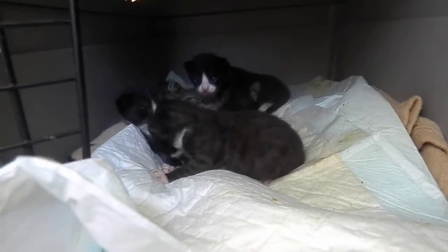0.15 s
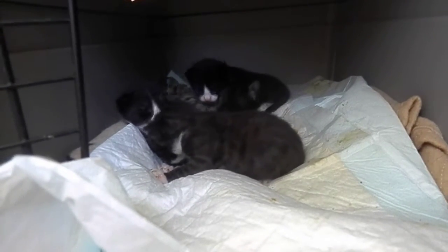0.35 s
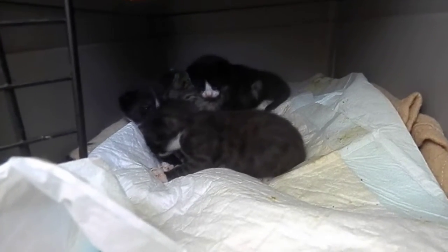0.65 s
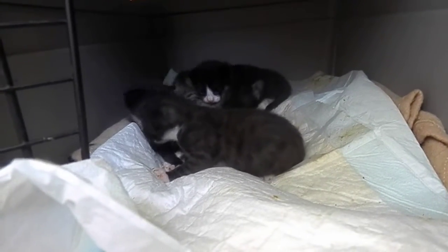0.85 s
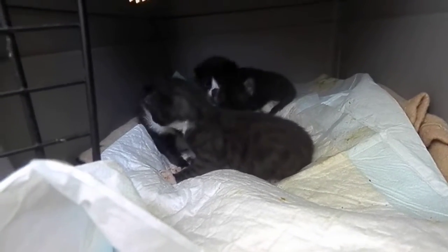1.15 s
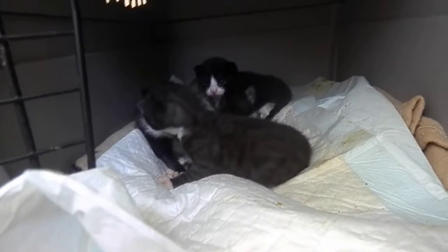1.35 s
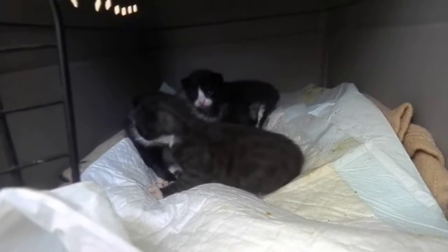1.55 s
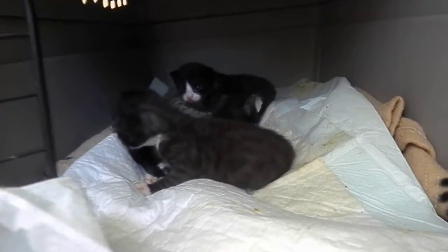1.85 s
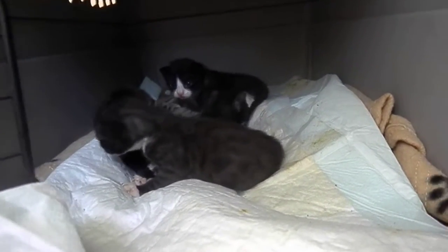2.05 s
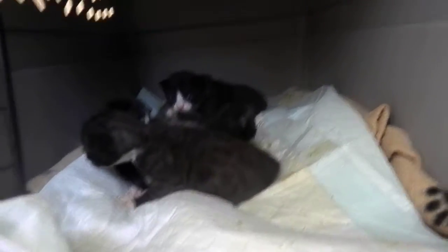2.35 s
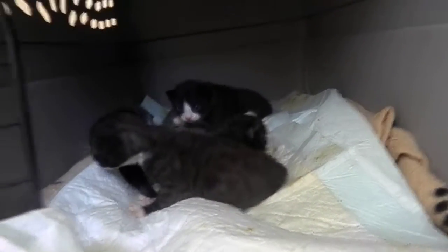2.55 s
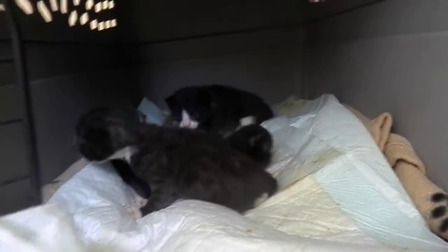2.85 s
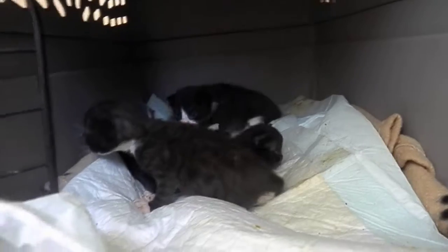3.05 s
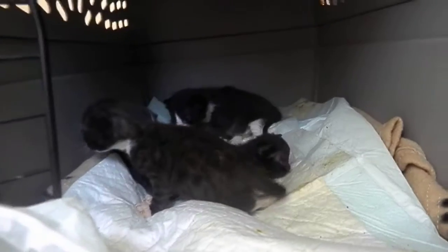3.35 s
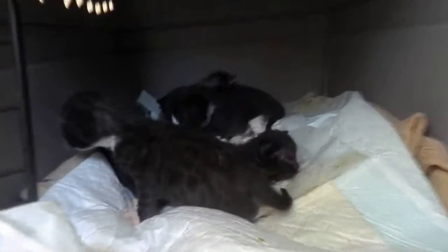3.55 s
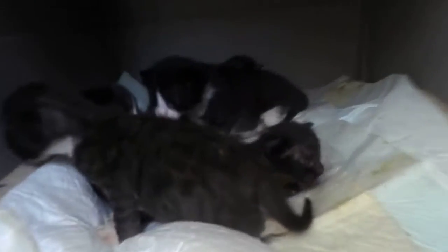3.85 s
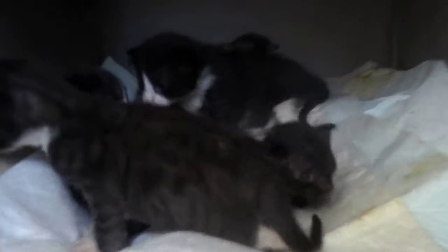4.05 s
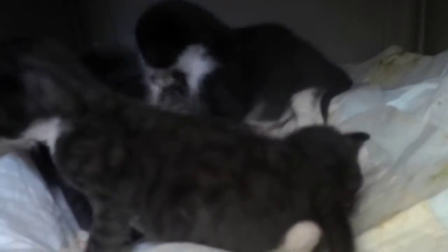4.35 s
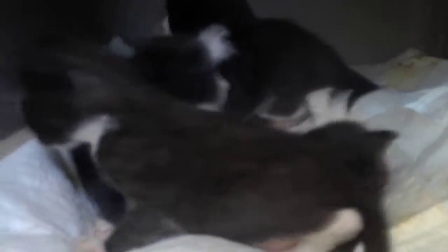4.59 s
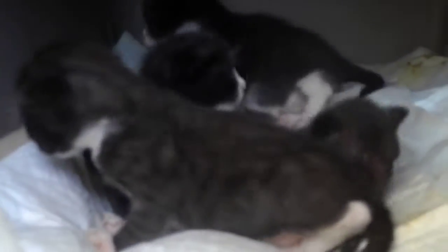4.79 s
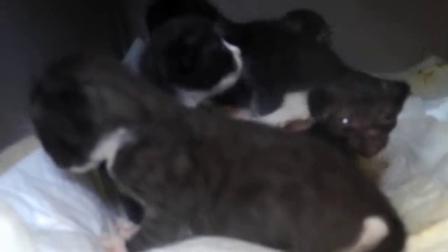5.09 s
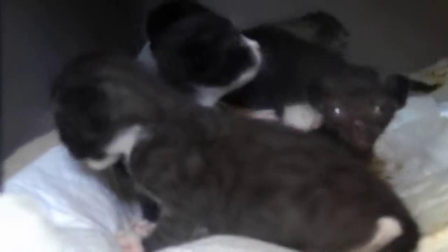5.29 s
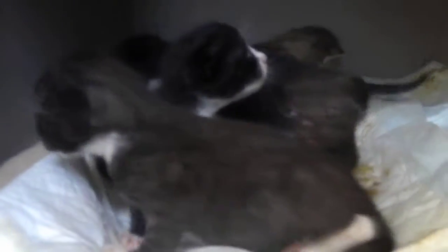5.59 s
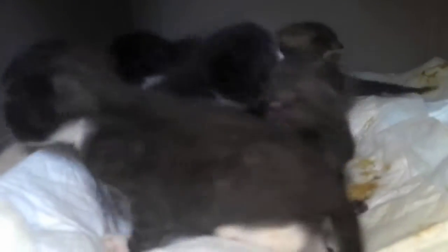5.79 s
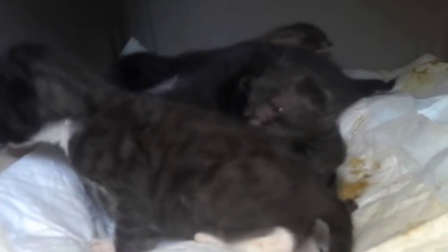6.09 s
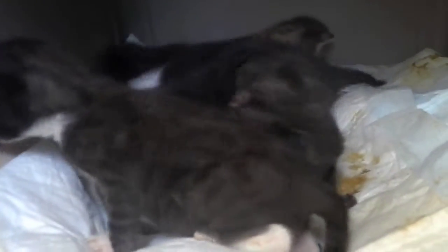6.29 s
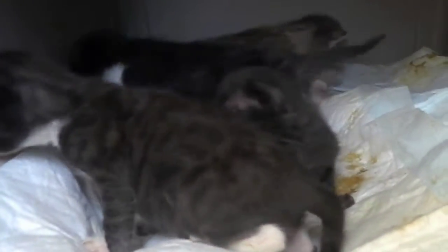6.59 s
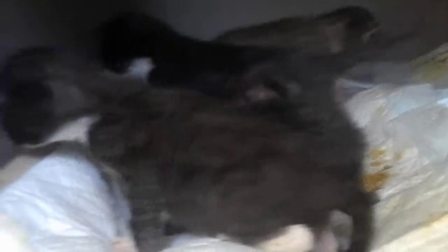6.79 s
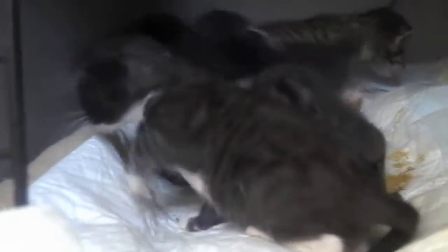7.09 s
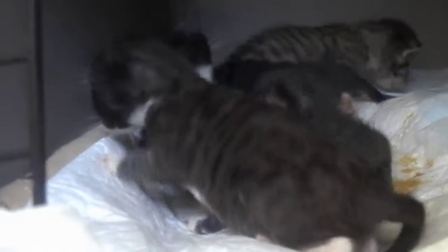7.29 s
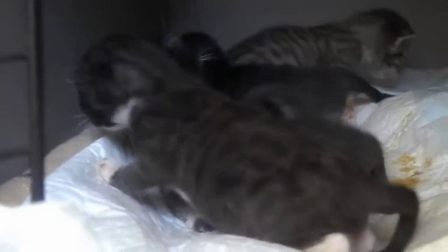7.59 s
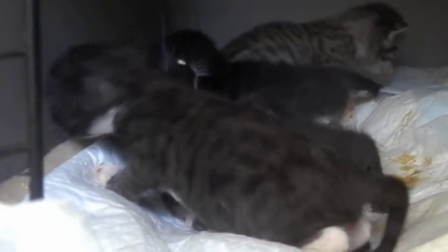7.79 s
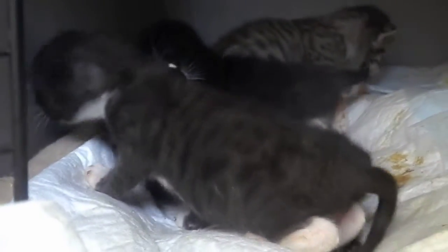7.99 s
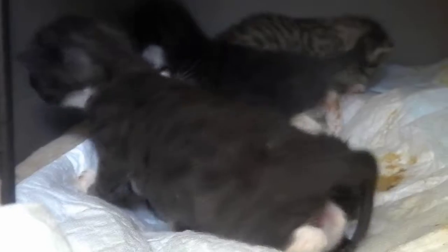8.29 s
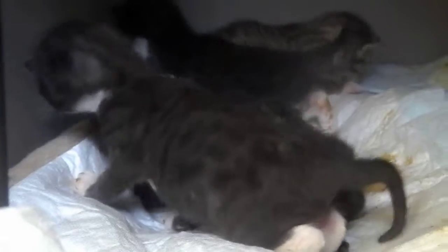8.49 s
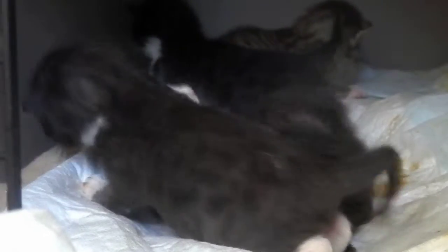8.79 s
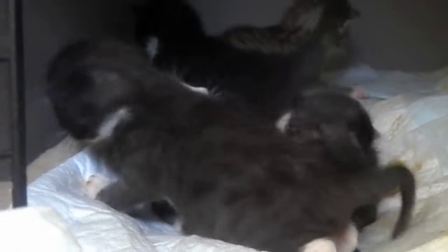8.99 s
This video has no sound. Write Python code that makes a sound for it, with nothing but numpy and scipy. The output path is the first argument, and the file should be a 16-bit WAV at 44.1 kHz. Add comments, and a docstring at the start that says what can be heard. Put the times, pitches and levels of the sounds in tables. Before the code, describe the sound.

A hand-held camera close to a crate of young kittens. Low engine drones and traffic rumble run throughout. Four brief, thin, squeaky mews come spread apart, some hoarse. Small plastic clicks tap constantly, one sharp snap early on, then a zoom motor whirs up and scuffs and knocks follow. Afterwards the focus motor chatters in tiny bursts over faint bedding rustles.

```python
"""Engines drone over traffic rumble from the start, as sines on pitch curves over coloured noise; air and
microphone hiss lie under them, and granular noise rustles as paws move on the bedding. Clicks of a hand-held
camera are scattered throughout, as blows that ring its housing. Kittens in a crate mew four times among them:
harmonic voices, hoarse at times, with creaky throat pulses leading into one mew and under the start of another.
From 1.6 s a focus motor steps in bursts of housing noise, and from 3.2 s to 4.3 s a zoom motor runs up and whirs."""
import sys
import numpy as np
from scipy import signal
from scipy.fft import rfft, irfft
from scipy.io import wavfile

SR = 44100
rng = np.random.default_rng(int(sys.argv[2]) if len(sys.argv) > 2 else 0)


def store_wav(level_fs):
    """Save 16-bit WAV to argv[1]."""
    pcm = np.round(np.clip(np.atleast_2d(level_fs), -1, 1) * 32767)
    wavfile.write(sys.argv[1], SR, pcm.T.astype(np.int16))


N = 403074


def amp(db):
    """Level to amplitude ratio: 20 dB is a factor of ten."""
    return 10 ** (np.asarray(db) / 20)


def evened(x):
    """Normalization to unit root-mean-square."""
    return x / np.sqrt(np.mean(x ** 2) + 1e-20)


def add(mix, s, sound):
    """Superposition: adds a sound to the mix in place from s seconds."""
    part = mix[round(s * SR):][:len(sound)]
    part += sound[:len(part)]


def curves(rows):
    """Linear interpolation: start time and the columns of a table at sample rate."""
    s, *columns = np.transpose(rows)
    t = np.arange(s[0], s[-1], 1 / SR)
    return s[0], [np.interp(t, s, c) for c in columns]


def wander(count, hz):
    """Low-passed noise: random drift of unit size, slower than hz."""
    lowpass = signal.butter(2, hz, fs=SR, output="sos")
    return evened(signal.sosfilt(lowpass, rng.standard_normal(count + SR))[SR:])


def coloured(x, points):
    """Spectral shaping: weights each frequency by a table on a log axis, to unit level."""
    f, db = np.transpose(points)
    hz = np.fft.rfftfreq(len(x), 1 / SR)
    shape_db = np.interp(np.log(hz + 1), np.log(f), db, -90, -90)
    return evened(irfft(rfft(x) * amp(shape_db), len(x)))


def band(x, lo_hz, hi_hz):
    """Band-pass filtering, second-order Butterworth design."""
    return signal.sosfilt(signal.butter(2, [lo_hz, hi_hz], "bandpass", fs=SR, output="sos"), x)


def tones(rows, jitter, flutter_db, drift_hz):
    """Frequency and amplitude modulation: a sine on a pitch curve that wavers in pitch and level."""
    s, (hz, db) = curves(rows)
    turns = np.cumsum(hz * (1 + jitter * wander(len(hz), drift_hz))) / SR
    sound = amp(db + flutter_db * wander(len(hz), drift_hz)) * np.sin(2 * np.pi * turns)
    return s, np.sqrt(2) * sound * signal.windows.tukey(len(hz), 0.011 / (rows[-1][0] - s))


def traffic():
    """Periodic firing gives engine tones, close pitches beat, and filtered noise gives a swelling rumble."""
    # The nearest engine slows, revs up and pulls away. Each row: time in seconds, firing rate in Hz,
    # level in dB, level of the octave in dB.
    engine = [(0, 119.3, -27, -54), (.28, 112.1, -33, -65), (.42, 107.3, -40, -60),
              (.62, 102.5, -35, -73.5), (.95, 105.8, -35.5, -66.5), (1.45, 108.5, -47, -66),
              (1.6, 113.7, -28.5, -55.5), (1.83, 120.9, -29.5, -53), (1.97, 122.8, -31.5, -46.5),
              (2.05, 123.5, -60, -46), (2.35, 127.9, -35, -47), (2.85, 130.3, -32.5, -44.5),
              (3.1, 132.5, -34.5, -38.5), (3.4, 132.9, -27.5, -40), (3.6, 131.7, -25.5, -40.5),
              (3.88, 129.3, -23, -46), (3.97, 128.4, -18.5, -43), (4.03, 129.9, -25.5, -42),
              (4.17, 126.2, -18.5, -36.5), (4.25, 126, -31.5, -51), (4.3, 124.4, -24.5, -43),
              (4.35, 125.1, -49, -47), (4.4, 122.1, -29.5, -50.5), (4.56, 116.7, -31.5, -43),
              (4.65, 118.2, -54, -50)]
    # A second engine close in pitch, beating against the first, and a third that idles later.
    # Each row: time in seconds, frequency in Hz, level in dB.
    neighbours = [
        [(2.1, 118, -46), (2.32, 122, -28.5), (2.72, 125, -30), (3, 125.5, -33.5), (3.3, 128, -24),
         (3.45, 130, -40)],
        [(4.7, 124, -43.5), (5.1, 119, -41), (5.32, 118, -41.5), (5.52, 121, -33.5), (5.68, 122, -48.5),
         (5.85, 122, -31), (6.32, 122.5, -41), (6.5, 123, -36.5), (7, 123.7, -30.5), (7.28, 124, -36.5),
         (7.5, 127, -32.5), (7.8, 125, -38.5), (8, 126, -33), (8.5, 126.5, -34.5), (9.14, 126, -36.5)],
    ]
    # A lower drone that joins later, with columns as for the neighbours.
    drone = [(5.6, 95.5, -49), (5.85, 99.63, -36.5), (6.4, 102.4, -36), (7.001, 103, -37.5),
             (7.25, 106, -46.5), (7.498, 107.9, -36), (8, 111.4, -50.5), (8.25, 112.2, -41),
             (8.601, 110.5, -52.5)]
    # Other faint hums and tones, one table each, with columns as for the neighbours.
    hums = [
        [(2.4, 187.6, -63.5), (2.7, 192, -45), (3.2, 198, -48.5), (3.9, 193.9, -47)],
        [(1.4, 158.2, -64.5), (1.8, 159.1, -45), (2.9, 161.7, -45.5), (3.1, 162, -58)],
        [(6.3, 205.4, -53), (6.7, 211, -46.5), (7.2, 213.6, -47), (8.1, 210.3, -54)],
        [(7.1, 172, -65), (7.4, 171.9, -38), (8.1, 169.7, -54)],
        [(0, 40.8, -48), (1.2, 40.65, -50), (2, 39.85, -43.5), (3.3, 37.8, -52), (4.5, 40.92, -46),
         (7, 41.36, -53), (9.14, 38.96, -52)],
        [(1.4, 63.31, -46.5), (3, 67.44, -46.5), (4.6, 64, -55), (5.3, 66.5, -42), (7.3, 69, -49.5),
         (8, 64.7, -58)],
        [(3.78, 570, -67.5), (3.82, 567.4, -53.5), (3.85, 553, -62), (3.89, 554.6, -52), (3.94, 545, -65),
         (3.98, 528, -58.5), (4.08, 497, -59)],
        [(8.2, 211, -52.5), (8.55, 210.7, -41.5), (8.65, 211.7, -35), (8.98, 209.4, -41), (9.14, 212, -50.5)],
    ]
    # Rumble spectrum, peaked at the lowest room modes. Each row: frequency in Hz, relative level in dB per Hz.
    rumble = [(18, -33.5), (27, -20), (39, -7.5), (52, -21), (67, 0.5), (88, -5.5), (120, 2), (165, -4.5),
              (280, -11.5), (372, -25.5), (714, -34.5), (1050, -38), (1500, -57), (2200, -80)]
    # Swell of the rumble. Each row: time in seconds, level in dB.
    swell = [(0, -39.5), (1.2, -40.5), (1.949, -36), (3.1, -36.5), (3.5, -37), (4.1, -35.5), (5.9, -35),
             (8.4, -35), (9.14, -37)]
    gust_db, waver_db = 1.2, 1.5  # rms drift of the rumble and of each tone

    swell_db = np.interp(np.arange(N) / SR, *np.transpose(swell)) + gust_db * wander(N, 5.24)
    out = coloured(rng.standard_normal(N), rumble) * amp(swell_db)
    firing = [(s, hz, db) for s, hz, db, _ in engine]
    octave = [(s, 2 * hz, db) for s, hz, _, db in engine]
    for rows in (firing, octave, *neighbours, drone, *hums):
        add(out, *tones(rows, 0.0063, waver_db, 8.8))
    return out


def air():
    """Stationary noise of still air and microphone, with a faint electronic whistle as a pure tone."""
    # Hiss spectrum. Each row: frequency in Hz, relative level in dB per Hz.
    hiss = [(760, -33), (1300, 5.5), (2810, -5.5), (3020, -22.5), (3320, -12.5), (3800, -29.5), (4090, -23),
            (8060, -14.5), (12100, -42), (14100, 1.5), (15700, 1)]
    hiss_db = -79.5
    whistle_hz, whistle_db = 14955, -94  # dB of its peak
    whistle = amp(whistle_db) * np.sin(2 * np.pi * whistle_hz * np.arange(N) / SR)
    return amp(hiss_db) * coloured(rng.standard_normal(N), hiss) + whistle


def bedding():
    """Granular friction noise: dense grains of uneven size in drifting clumps, louder under a paw stroke."""
    # Rustle of the bedding. Each row: time in seconds, level in dB before the clumps drift.
    rustle = [(0, -92), (.3, -102), (0.601, -87.5), (1.16, -100), (1.5, -82), (1.68, -72.5), (1.95, -80),
              (2.73, -75.5), (3.02, -65), (3.26, -73.5), (4.18, -96.5), (4.239, -65.5), (4.53, -58),
              (4.8, -74), (5.15, -74), (5.3, -82), (5.66, -68), (6.06, -75.5), (6.76, -82), (7.14, -73.5),
              (8.26, -76.5), (8.51, -77), (9.14, -80)]
    # Colour of the cloth. Each row: frequency in Hz, relative level in dB per Hz.
    cloth = [(400, -21), (650, -2), (1000, 2.5), (2300, 0), (3000, -6.5), (4500, -8), (6800, -3),
             (8800, -8.5), (10300, -24.5), (15000, -29)]
    # Paw strokes on the pad. Each row: start in seconds, length in seconds (at least 0.01), level in dB.
    strokes = [(0.56, 0.044, -76), (1.589, 0.067, -92.5), (4.234, 0.04, -69), (4.283, 0.025, -71),
               (4.376, 0.033, -79), (4.445, 0.047, -86), (4.532, 0.042, -55), (4.584, .051, -73),
               (4.64, 0.045, -58), (5.514, 0.035, -86), (8.491, 0.079, -67.5), (8.546, 0.057, -65.5)]
    # A dull scuff of the hand on the camera. Each row: time in seconds, level in dB.
    scuff = [(4.2, -80), (4.25, -48.5), (4.3, -65), (4.37, -58.5), (4.45, -66), (4.5, -67), (4.555, -61),
             (4.6, -65), (4.66, -69), (4.72, -74)]
    grains_per_s = 2500

    size = amp(1.0 * np.minimum(rng.exponential(1, N), 5)) * (rng.random(N) < grains_per_s / SR)
    grains = evened(size * rng.standard_normal(N)) + 0.42 * rng.standard_normal(N)
    clumps_db = 3.9 * np.clip(wander(N, 11), -1.3, 1.5)
    level = amp(np.interp(np.arange(N) / SR, *np.transpose(rustle)) + clumps_db)
    for s, length, db in strokes:
        add(level, s, amp(db) * signal.windows.tukey(round(max(length, .01) * SR), .6))
    out = coloured(grains, cloth) * level
    s, (scuff_db,) = curves(scuff)
    rub = evened(band(grains[:len(scuff_db)], 450, 1900))
    add(out, s, rub * amp(scuff_db + 4.0 * wander(len(scuff_db), 25)))
    return out


def housing(x):
    """Modal resonance: the plastic shell rings in decaying sines, neighbours in opposite phase."""
    # Modes of the camera housing. Each row: frequency in Hz, width in Hz, relative level in dB.
    modes = [(1590, 90, -2), (1890, 130, 0), (2290, 120, 0), (2520, 200, -5), (3680, 70, -12),
             (4350, 200, -15)]
    t = np.arange(900) / SR
    ring = sum((-1) ** k * amp(db) * w * np.exp(-np.pi * w * t) * np.sin(2 * np.pi * f * t)
               for k, (f, w, db) in enumerate(modes))
    ring = ring * np.minimum(t / 0.00041, 1)  # the shell takes a moment to start moving
    return signal.oaconvolve(x, ring / np.linalg.norm(ring))[:len(x)]


def clicks():
    """Impact excitation: a sharp blow and a puff of noise give a crack, the nearest housing mode and a thud."""
    # Clicks and snaps. Each row: time in seconds, treble peak in dB, treble centre in Hz,
    # housing ring peak in dB, nominal thud level in dB.
    snaps = [(0.055, -63, 7070, -72, -57.5), (.187, -69, 4200, -73, -64), (0.388, -68, 7200, -72, -59),
             (0.453, -69, 7100, -73, -65), (0.8626, -74, 7200, -86, -60), (1.1768, -71.5, 4270, -81, -63.5),
             (1.607, -58, 3150, -62, -54.5), (1.652, -70, 3500, -61, -50), (1.711, -67, 5200, -74, -55),
             (1.8232, -65, 4410, -65, -58), (2.0934, -69, 4860, -70, -56), (2.2, -48.5, 7570, -80, -73),
             (2.264, -63, 5970, -67, -55), (2.2992, -24, 7400, -31.5, -47), (2.312, -63, 5500, -56, -63),
             (2.844, -68, 4156, -65, -58), (2.946, -52, 6760, -63, -60), (2.953, -44.5, 6980, -67, -58),
             (2.9636, -49, 6940, -61, -60), (3.012, -49, 7700, -59, -56), (3.032, -48, 7000, -42, -58),
             (3.154, -52, 8500, -60, -57.5), (3.16, -74, 4300, -56, -61), (3.1985, -50, 4095, -48, -41),
             (3.991, -45, 7300, -57, -49), (4.314, -44, 4031, -43.5, -41.5),
             (4.4151, -41, 5470, -34.5, -43), (4.467, -50, 7000, -60, -53), (4.476, -46, 4140, -57, -58),
             (4.486, -50, 6210, -51, -61), (4.5243, -36, 7000, -39.5, -39), (4.529, -43, 5600, -50, -40),
             (4.6575, -47, 4160, -66, -46), (4.928, -65, 4050, -71, -61), (5.2039, -44.5, 4640, -52, -51),
             (5.532, -60, 6200, -70, -56), (5.541, -63, 6230, -60, -58), (5.5746, -59, 5010, -73, -60),
             (5.593, -49, 5600, -52, -52), (5.6, -55, 5600, -72, -64), (5.655, -44.5, 6040, -56, -47),
             (5.808, -68, 4030, -74, -50.5), (5.836, -57, 3570, -62, -47), (5.924, -74, 6420, -80, -66),
             (5.976, -58.5, 6200, -64, -50), (6.061, -69, 4500, -74, -60), (6.187, -56, 6500, -72, -52),
             (6.329, -59, 6550, -65, -59), (6.543, -63.5, 4300, -71, -55), (7.021, -60, 5770, -65, -66.5),
             (7.1843, -64, 7000, -79, -49.5), (7.53, -61, 6610, -64, -60), (7.597, -63.5, 6000, -74, -67),
             (8.0002, -61, 4840, -61, -54), (8.009, -58, 4876, -63, -52), (8.0893, -64, 5397, -73, -57),
             (8.105, -60, 6500, -74, -58), (8.312, -60, 7570, -74, -66), (8.452, -56, 7055, -64, -54),
             (8.656, -67, 4200, -77.5, -64), (8.708, -69, 6000, -75, -66), (8.927, -64, 5200, -67, -59.5)]
    # Louder clicks are given a higher ring, sharper start and shorter decay. Each row: peak in dB,
    # favoured mode in Hz, 60 dB decay in seconds, rise in seconds, tick size from 0 to 1.
    loudness_traits = [(-66, 2000, 0.072, 0.0035, 0.1), (-55.5, 2100, 0.048, 0.001, 0.7),
                       (-29, 2580, 0.008, 0.00033, 0.95)]
    # Dull knocks with a pitch of their own. Each row: time in seconds, frequency in Hz, peak in dB before decay.
    dull_knocks = [(3.128, 970, -47), (3.138, 900, -49), (3.2007, 450, -29), (4.312, 1060, -42)]
    knock_t60_s, thud_t60_s = 0.032, 0.046

    out = np.zeros(N)
    t, noise = np.arange(3000) / SR, rng.standard_normal((len(snaps), 3000))
    peaks_db, modes_hz, decays, rises, ticks = np.transpose(loudness_traits)
    for (s, treble_db, hz, ring_db, thud_db), z in zip(snaps, noise):
        mode_hz = np.interp(ring_db, peaks_db, modes_hz)
        t60_s = np.interp(max(ring_db, treble_db - 7.5), peaks_db, decays)
        rise_s = np.interp(treble_db, peaks_db, rises)
        tick = np.interp(treble_db, peaks_db, ticks)
        puff = z * amp(-60 * t / max(t60_s, .004)) * np.minimum(t / max(rise_s, .0005), 1)
        blow = tick * np.exp(-((t - .001) / .00003) ** 2) + 0.24 * puff
        crack = band(band(blow, 0.88 * hz, 1.12 * hz), 0.78 * hz, 1.4 * hz)
        crack = crack + 0.16 * band(blow, 470, 7500) + 0.13 * band(blow, 8000, 15500)
        ring = band(band(housing(blow), 0.8 * mode_hz, 1.15 * mode_hz), 0.7 * mode_hz, 1.4 * mode_hz)
        thud_hz = 420 * amp(0.94 * z[-1])  # scatters from click to click
        thud = 1.2 * np.sin(2 * np.pi * thud_hz * t) * amp(-60 * t / thud_t60_s) + 3.2 * band(puff, 350, 1400)
        sound = amp(treble_db) * crack / abs(crack).max() + amp(ring_db) * ring / abs(ring).max()
        add(out, s - .001, sound + amp(thud_db) * thud)  # the tick peaks 1 ms into the blow
    for s, hz, db in dull_knocks:
        decay = amp(db - 60 * t / knock_t60_s)
        add(out, s, decay * np.minimum(t / 0.0017, 1) * np.sin(2 * np.pi * hz * t))
    return out


def kittens():
    """Source-filter voice: throat-coloured overtones; hoarseness perturbs pitch and level, cycles may double."""
    # One table a mew. Each row: time in seconds, pitch in Hz, level of the fundamental in dB,
    # lift of the overtones in dB, higher with the mouth open.
    mews = [
        [(.488, 1970, -83, 12), (.506, 1897, -74, -7), (.518, 1847, -68, 0), (.535, 1873, -77, 5),
         (.541, 1650, -63, -6), (.553, 1664, -68, -3), (.56, 1764, -61, -9), (.576, 1693, -65, -11),
         (.59, 1675, -66, -7), (.606, 1720, -61, -10), (.62, 1630, -68, -2), (.642, 1600, -66, -6),
         (.651, 1694, -62, -6), (.678, 1640, -60.5, -4), (.7, 1697, -67.5, 2), (.76, 1683, -65, -4),
         (.82, 1570, -76, -5), (.845, 1440, -65, -11), (.875, 1300, -74, -22)],
        [(2.812, 1082, -55, 2), (2.826, 1111, -56, -1), (2.834, 1211, -63, 7), (2.85, 1279, -68, 6),
         (2.872, 1446, -69.5, 14.5), (2.878, 1500, -63, -4), (2.89, 1539, -61.5, -6), (2.93, 1620, -57.5, -8),
         (3, 1650, -64, -9), (3.088, 1595, -58, -23), (3.184, 1452, -69, -22.5), (3.215, 1329, -73, -10),
         (3.235, 1217, -71, -12), (3.25, 1137, -68, -14)],
        [(5.503, 977, -74, 4), (5.52, 1042, -65, -4), (5.532, 1060, -61, -9), (5.546, 1150, -57, -7),
         (5.557, 1260, -67, 3), (5.562, 1326, -64, -10), (5.574, 1387, -71, -14), (5.59, 1550, -66, -15),
         (5.636, 1563, -65, -18), (5.762, 1523, -64.5, -24), (5.81, 1500, -78, -14)],
        [(7.29, 1194, -76, -10), (7.304, 1145, -57, -8), (7.341, 1026, -58.5, -4.5), (7.389, 1149, -56, -10),
         (7.445, 1150, -58.5, -5), (7.47, 1130, -57, -17), (7.51, 1030, -63, -26)],
    ]
    # Throat colour of the overtones. Each row: frequency in Hz, level in dB.
    throat = [(2000, 3.5), (2300, -5.5), (2900, -11.5), (3400, -9.5), (3750, -22), (4400, -14.5), (5000, 5),
              (5650, 9), (6800, 13)]
    # Most mews turn hoarse early, then clear; the last stays nearly clear. Each row: seconds into the mew
    # when this hoarseness is reached, hoarseness from 0 to 1, seconds into the mew at the middle of the clearing.
    hoarse_spells = [(.09, 1, .155), (.05, .5, .16), (.005, .75, .07), (.005, .15, .05)]
    clear, clearing_s = .12, .02  # hoarseness left at the end, half length of the clearing
    # Spells of strong-weak cycles. Each row: centre in seconds, length in seconds,
    # level of the half-order lines in dB, level of the undertone in dB.
    doubled_cycles = [(0.548, .024, 4, -20), (0.588, .04, -4, -12), (0.595, 0.014, -20, 7),
                      (0.63, .04, -7, -14), (2.884, .026, -1, -18)]

    out, doubling, undertone = np.zeros((3, N))
    for s, length, half_db, under_db in doubled_cycles:
        spell = signal.windows.tukey(round(length * SR), .5)
        add(doubling, s - length / 2, amp(half_db) * spell)
        add(undertone, s - length / 2, amp(under_db) * spell)
    for rows, (from_s, most, clear_s) in zip(mews, hoarse_spells):
        s, (hz, db, mouth_db) = curves(rows)
        count = len(hz)
        turning_s = [0, from_s, clear_s - clearing_s, clear_s + clearing_s]
        hoarse = np.interp(np.arange(count) / SR, turning_s, [2 * clear, most, most, clear])
        turns = np.cumsum(hz * (1 + (.003 + .012 * hoarse) * wander(count, 90))) / SR
        half, under = (x[round(s * SR):][:count] for x in (doubling, undertone))
        voice = np.sin(2 * np.pi * turns) + under * np.sin(np.pi * turns)
        for k in np.arange(3, 9) / 2:  # orders 1.5 to 4; the half orders sound only in doubled cycles
            order_db = -14.4 * (k - 2)  # overtones weaken with their order
            colour_db = np.interp(k * hz, *np.transpose(throat)) + mouth_db + order_db + 4.3 * wander(count, 24)
            breathy = 1 - .35 * hoarse + .55 * hoarse * wander(count, 120 * k)
            overtone = amp(colour_db) * breathy * np.sin(2 * np.pi * k * turns)
            voice = voice + overtone * (half if k % 1 else 1)
        flutter = 1 + .35 * hoarse * wander(count, 250)
        add(out, s, np.sqrt(2) * amp(db) * voice * flutter * signal.windows.tukey(count, .08))
    return out


def focus_envelopes():
    """Transient excitation: envelopes of each focus burst for lower and upper modes and the starting jerk."""
    # The focus motor hunts in bursts. Each row: reference time in seconds, nominal length in seconds,
    # nominal level in dB, upper housing modes against lower in dB.
    hunting = [(1.608, 0.04, -66.5, 4), (1.625, 0.027, -68, -3), (1.65, 0.04, -64, 1),
               (1.68, 0.036, -71, 4), (1.72, 0.072, -73, 0), (1.785, 0.04, -71, 4), (2.268, 0.038, -67, 0),
               (4.402, 0.026, -52, -4), (4.606, 0.03, -54.5, 3), (4.731, 0.025, -60, -8),
               (4.805, 0.028, -62, -4), (4.879, 0.041, -64, -11), (4.937, 0.022, -60.5, -5),
               (5.004, 0.026, -59.5, -3), (5.077, 0.041, -63, -2), (5.133, 0.021, -61, -4),
               (5.265, 0.017, -61, -24), (5.474, 0.057, -66, -8), (5.87, 0.028, -64, -3),
               (5.965, 0.012, -66, -2), (6.004, 0.036, -60, -5), (6.143, 0.034, -66, 0),
               (6.201, 0.035, -69, -3), (6.34, 0.031, -61, -9), (6.539, 0.036, -61.5, -12),
               (6.603, 0.02, -60.5, -8), (6.671, 0.029, -66, -3), (6.803, 0.018, -57.5, -16),
               (6.939, 0.022, -56.5, -16), (7.003, 0.037, -58.5, -4), (7.071, 0.041, -60, -2),
               (7.134, 0.016, -65, -5), (7.194, 0.04, -65, 7), (7.475, 0.024, -61, -9),
               (7.605, 0.038, -62, -1), (7.671, 0.046, -63.5, -2), (7.804, 0.037, -62, -11),
               (7.874, 0.035, -63, 2), (7.938, 0.046, -61.5, -3.5), (8.008, 0.031, -61, 2),
               (8.071, 0.036, -66, 2), (8.14, 0.021, -59, 3), (8.207, 0.022, -62, -20),
               (8.338, 0.034, -65.5, -14), (8.411, 0.062, -68, -2), (8.473, 0.03, -60, -10),
               (8.607, 0.017, -62, -13), (8.735, 0.016, -70, -8), (8.81, 0.042, -61.5, -4),
               (8.87, 0.019, -67, -13)]
    # faint ticks at a nearly regular step run on under the later bursts
    first_s, last_s, step_s, scatter_s = 4.738, 9.1, 1 / 15, 0.0051
    tick_s, tick_db, tick_spread_db, colour_spread_db = 0.0073, -76, 1, 2.5  # nominal length and level

    low, high, jerk = np.zeros((3, N))
    ticks = np.arange(first_s, last_s, step_s)
    size, late, long, tilt = rng.standard_normal((70, 4))[:len(ticks)].T
    idle = zip(ticks + scatter_s * late, tick_s * amp(2.7 * long),
               tick_db + tick_spread_db * size, colour_spread_db * tilt - 7.5)
    for s, length, db, upper_db in (*hunting, *idle):
        t = np.arange(0, max(length, .005) * 0.9, 1 / SR)
        start = s - .24 * length
        burst = amp(db - 1.5) * np.minimum(t / .002, 1) * (1 - t / t[-1]) ** 1.1
        burst = burst / np.hypot(1, amp(upper_db))  # shares the power between the modes
        add(low, start, burst)
        add(high, start, burst * amp(upper_db))
        add(jerk, start, amp(db - 15.5 - 60 * t / .025))
    return low, high, jerk


def motors():
    """Forced vibration: motor steps shake the housing and gate a gear whine, in focus bursts and a long zoom."""
    # Zoom motor. Each row: time in seconds, nominal level in dB.
    zoom_rows = [(3.208, -65), (3.26, -72), (3.3, -72), (3.37, -71), (3.54, -63), (3.98, -57.5),
                 (4.226, -54), (4.28, -67)]
    # It runs up from single steps. Each row: time in seconds, share of the full step rate.
    run_up = [(3.2125, .42), (3.255, .44), (3.277, .5), (3.292, .6), (3.33, .78), (3.37, 1)]
    # Gear whine of the motors. Each row: frequency in Hz, relative level in dB per Hz.
    gears = [(2800, -21.5), (3300, -6.5), (5300, -11.5), (5700, -0.5), (8300, 2.5), (9500, -7),
             (10300, -27), (11300, -25.5), (11800, -13.5), (15500, -16)]
    full_rate_hz, step_decay_s = 268.4, .0014

    low, high, jerk = focus_envelopes()
    zoom = np.zeros(N)
    s, (level_db,) = curves(zoom_rows)
    add(zoom, s, amp(level_db) * signal.windows.tukey(len(level_db), .02))

    speed = np.interp(np.arange(N) / SR, *np.transpose(run_up), left=1)
    rate = full_rate_hz * speed * (1 + .12 * speed ** 4 * wander(N, 30))
    turns = np.cumsum(rate) / SR
    since_step = (turns - turns[round(run_up[0][0] * SR)]) % 1 / rate  # seconds
    gate = evened(0.47 * speed ** 2 + np.exp(-since_step / step_decay_s) / speed)
    knocks = 22.0 * (1 - speed) * (np.diff(since_step, prepend=0) < 0)  # one a step, below full speed

    shake = housing(gate * rng.standard_normal(N) + knocks)
    murmur = evened(band(rng.standard_normal(N), 420, 560))
    murmur = murmur + 0.85 * evened(band(rng.standard_normal(N), 750, 1300))
    whine = gate * coloured(rng.standard_normal(N), gears)
    crackle = evened(band(band(gate * rng.standard_normal(N), 1500, 2650), 1500, 2650))

    lower_modes = evened(band(shake, 1600, 2080))
    upper_modes = evened(band(band(shake, 2080, 2750), 2000, 2900))
    focus = low * lower_modes + high * upper_modes + jerk * whine
    focus = focus + (low + high) * (amp(-7.0) * crackle + amp(-22.0) * whine)
    return zoom * (amp(2.0) * shake + amp(-4.0) * whine + amp(-0.5) * murmur * speed) + focus


def creaks():
    """Pulse excitation of resonances: uneven throat pulses speed up into one mew and under another's start."""
    # Each row: start in seconds, length of the pulse train in seconds, first rate in Hz, last rate in Hz,
    # level in dB.
    pulse_trains = [(2.7535, .062, 170, 260, -65), (5.508, .04, 190, 230, -71)]
    # Resonances they ring. Each row: frequency in Hz, width in Hz, relative level in dB.
    resonances = [(1600, 300, -4), (2180, 300, 0), (2950, 160, -12)]
    out, t = np.zeros(N), np.arange(400) / SR
    ring = sum(amp(db) * w * t * np.exp(-2 * np.pi * w * t) * np.sin(2 * np.pi * f * t)
               for f, w, db in resonances)
    for s, length, first_hz, last_hz, db in pulse_trains:
        count = round(length * SR)
        size, breath = rng.standard_normal((4000, 2))[:count].T
        turns = np.cumsum(np.linspace(first_hz, last_hz, count)) / SR
        pulses = np.diff(np.floor(turns), prepend=-1) * amp(3.5 * size) + .03 * breath
        pulses = pulses * np.minimum(1, np.linspace(5, .3, count)) * np.linspace(.7, 1, count)
        add(out, s, amp(db) * evened(signal.oaconvolve(pulses, ring)))
    return out


def scene():
    """Superposition of all sources in one channel."""
    return (traffic() + kittens() + creaks() + motors() + clicks() + bedding() + air())[None]


def record(dry):
    """Low-pass filtering: the band limit of the camera."""
    edge_hz = 15800
    return signal.oaconvolve(dry, signal.firwin(511, edge_hz, window=("kaiser", 9), fs=SR)[None], "same")


dry = scene()
out = record(dry)
store_wav(out)
```